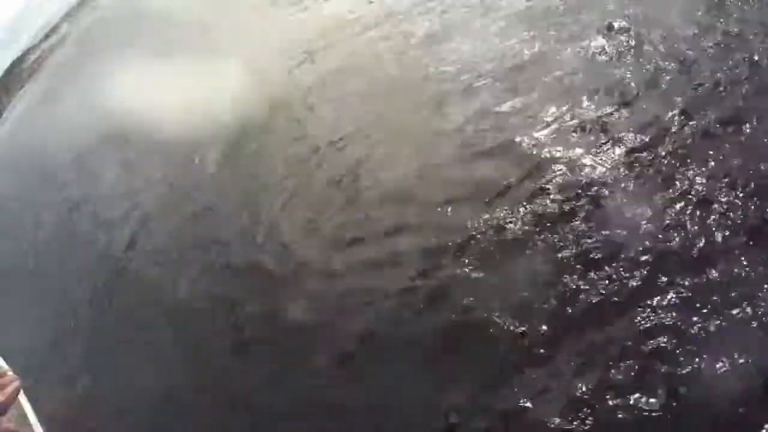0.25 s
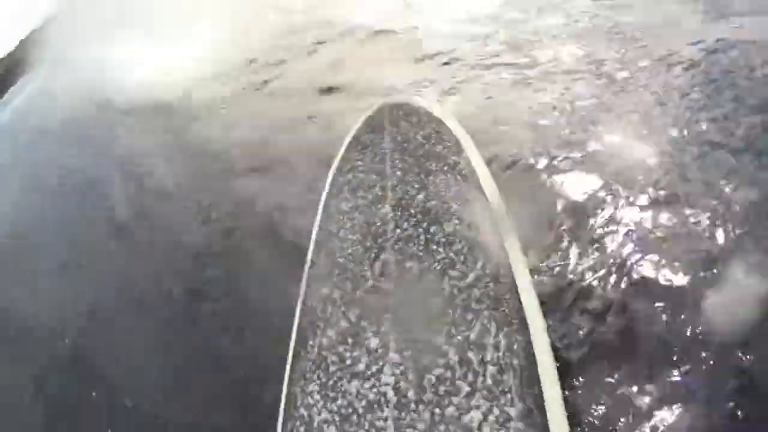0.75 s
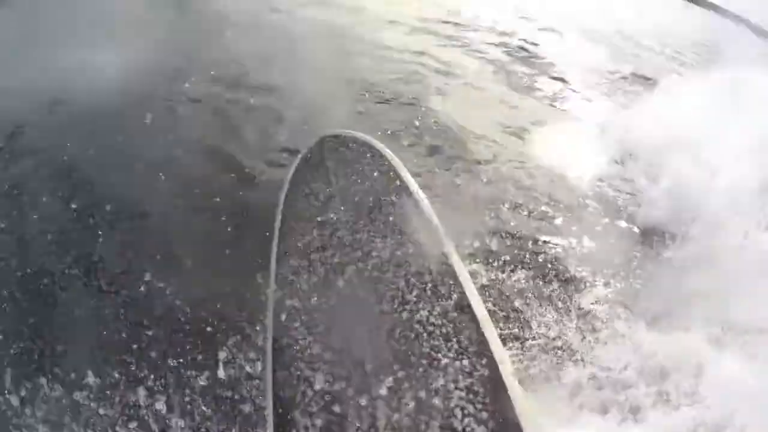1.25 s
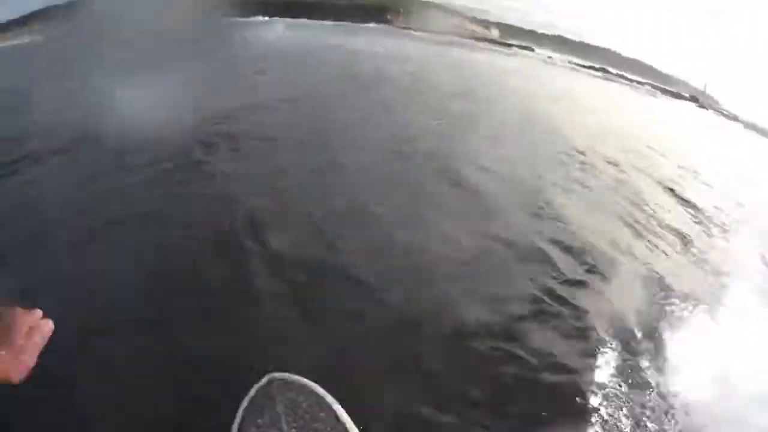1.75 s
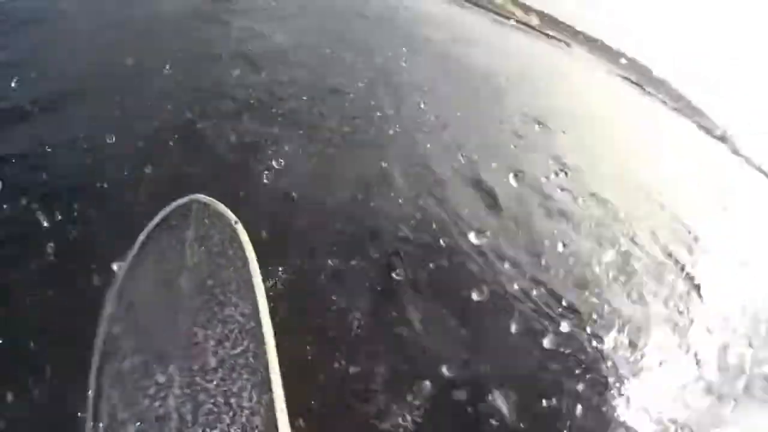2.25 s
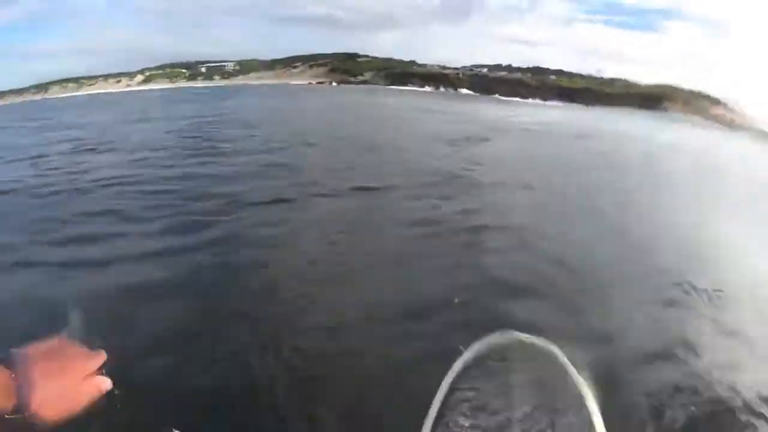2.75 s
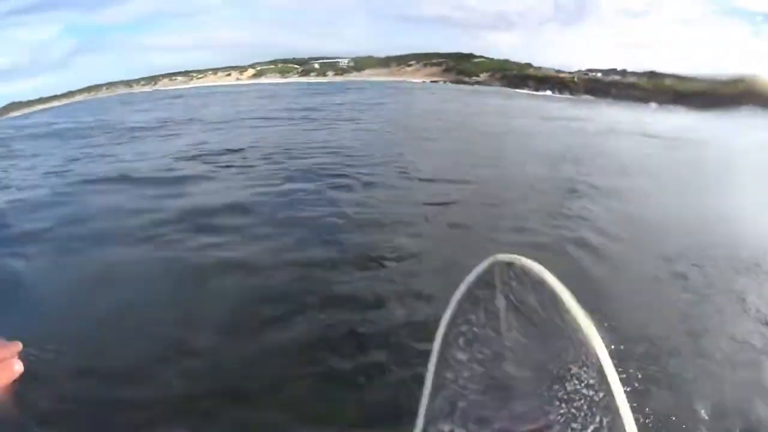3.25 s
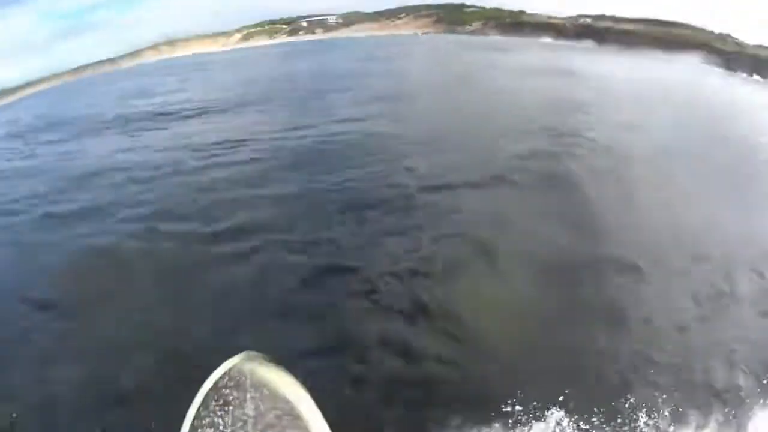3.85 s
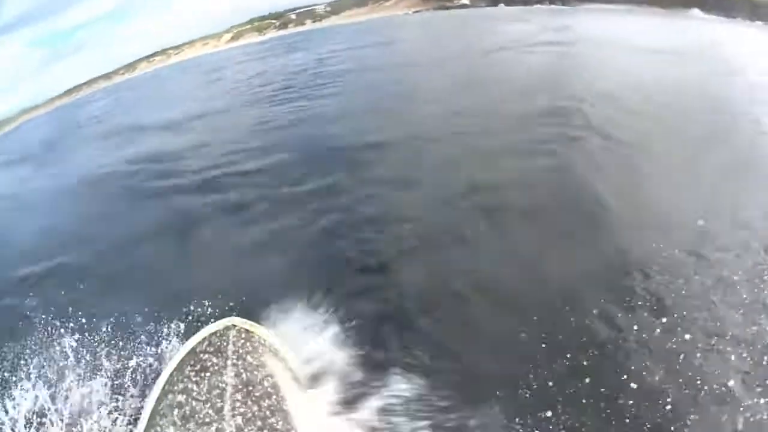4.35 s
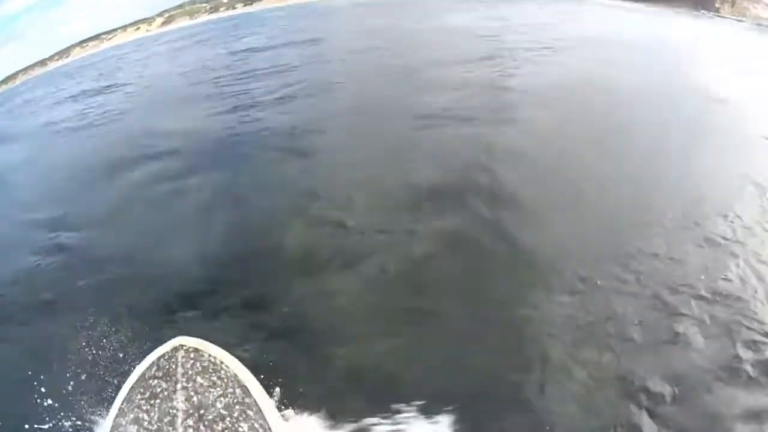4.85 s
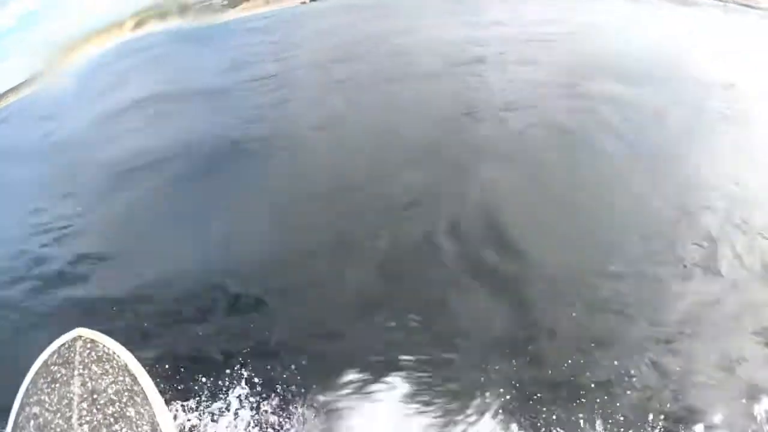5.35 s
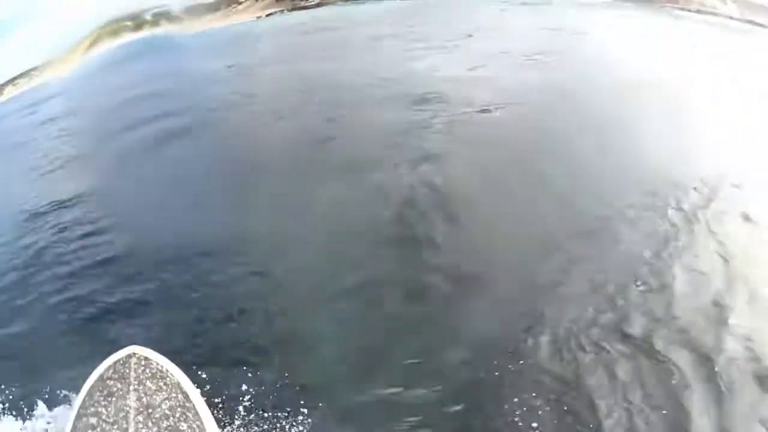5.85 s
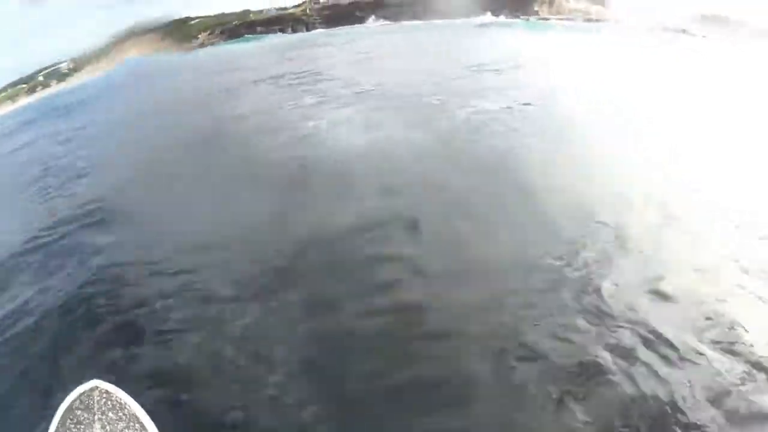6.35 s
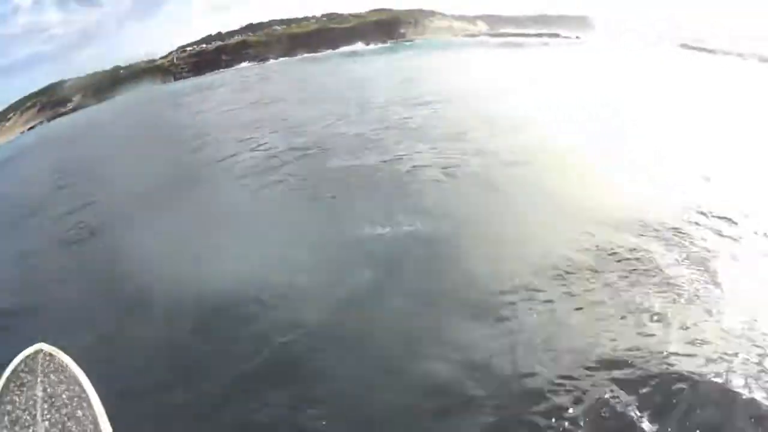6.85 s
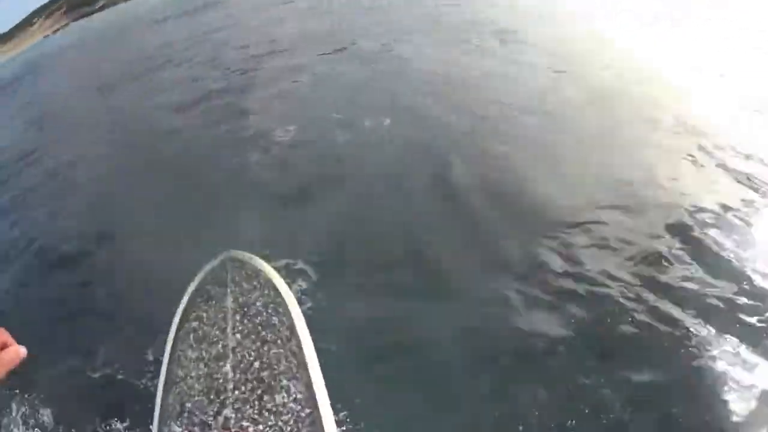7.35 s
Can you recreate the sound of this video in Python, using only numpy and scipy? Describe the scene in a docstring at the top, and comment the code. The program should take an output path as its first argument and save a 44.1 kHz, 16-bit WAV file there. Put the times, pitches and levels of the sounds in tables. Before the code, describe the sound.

Heard from inside a waterproof case on a surfer riding open sea: uneven rushing and washing water, fluttering low wind, dulled highs. One loud splash strikes the case around two seconds, crackling into hollow plops and a short watery warble toward the left. Afterwards the rush rises and falls with gusts, wind thumps cluster near three and a half to four seconds, and a few soft drops knock.

```python
"""Water on a sealed camera case above a surfboard

Wind buffets the two wet ports of the case, the sea rushes under the board and spray hisses: noise in half-octave
bands, coloured by the ports and raised and lowered by level curves. A sheet of water is thrown over the case:
a burst of drops excites falling thumps, case modes and ticks amid a spatter of small drops; a water film on
one port sings briefly as a wavering sine, and single drops fall before and after. The case muffles it all."""
import sys
import numpy as np
from scipy import signal
from scipy.fft import rfft, irfft, next_fast_len
from scipy.io import wavfile

SR = 44100
rng = np.random.default_rng(int(sys.argv[2]) if len(sys.argv) > 2 else 0)


def output_pcm(signal):
    """Save a mono or channel-first signal as 16-bit PCM at the path in sys.argv[1].

    Samples are clipped to [-1, 1] before scaling.
    """
    pcm = np.clip(np.atleast_2d(signal).T, -1, 1) * 32767
    wavfile.write(sys.argv[1], SR, np.round(pcm).astype(np.int16))


N = 335160


def amp(db):
    """Level law: dB to amplitude gain."""
    return 10 ** (np.asarray(db) / 20)


def rms_one(x):
    """Power normalisation: scaled to rms 1."""
    return x / np.sqrt(np.mean(x ** 2) + 1e-20)


def in_time(rows):
    """Linear interpolation: the columns of a table, sample by sample."""
    t, *columns = np.transpose(rows)
    return [np.interp(np.arange(N) / SR, t, column) for column in columns]


def in_pitch(rows, hz):
    """Interpolation on a logarithmic frequency axis: the columns of a table at the given frequencies."""
    at, *columns = np.transpose(rows)
    return [np.interp(np.log(np.maximum(hz, 1)), np.log(at), column) for column in columns]


def live(start, end):
    """Time gate: 1 between two times in s, else 0."""
    t = np.arange(N) / SR
    return (t > start) & (t < end)


def drift(rate):
    """Slow random modulation: noise through two equal poles at rate (Hz), spread 1."""
    step = 40   # samples between computed points
    pole = np.exp(-2 * np.pi * rate * step / SR)
    settle = 2000   # points dropped while the filter settles
    noise = rng.standard_normal(N // step + settle + 2)
    slow = signal.lfilter([1], [1, -2 * pole, pole * pole], noise)[settle:]
    return np.interp(np.arange(N) / step, np.arange(len(slow)), rms_one(slow))


def ring(clicks, hz, t60):
    """Damped resonator: a unit click sets a sine of height 1 ringing, 60 dB down after t60 (s)."""
    r, w = amp(-60 / (t60 * SR)), 2 * np.pi * hz / SR
    return signal.lfilter([0, np.sin(w)], [1, -2 * r * np.cos(w), r * r], clicks + 1e-18)


def low_pass(x, hz):
    """Second-order low-pass: 12 dB per octave above the corner."""
    return signal.lfilter(*signal.butter(2, hz, fs=SR), x + 1e-18)


HISS_GAIN_DB = -70.5   # gain applied to the sum of common and own noise


def hiss():
    """Partly correlated white noise: steady microphone noise, mostly common to both sides."""
    common, left, right = rng.standard_normal((3, N))
    return amp(HISS_GAIN_DB) * (0.53 * common + 0.44 * np.array([left, right]))


# short changes of wind on the ports, mostly buffets: t/s, peak change of wind level/dB, half-length/s
BUFFETS = [(0.0, 14, 0.028), (0.126, 8.5, .04), (0.302, 5, .05), (0.522, 5, 0.1), (1.27, 0, .04),
           (1.61, 7.5, 0.036), (1.985, 4, .05), (2.604, 6.5, .07), (3.384, 6, 0.024), (3.55, 11.5, 0.036),
           (3.808, 8, 0.034), (3.93, 9, 0.042), (4.107, 7, .04), (4.417, 4.5, 0.032), (4.912, 4, 0.036),
           (6.082, 1, 0.027), (6.82, -0.5, .04), (7.15, 2.5, .04), (7.49, 2.5, 0.049)]


def gusts_db():
    """Gaussian envelopes: each is a short bell-shaped change of the wind level."""
    t = np.arange(0, N, 40) / SR
    change = sum(db * np.exp(-((t - at) / half_s) ** 2) for at, db, half_s in BUFFETS)
    return np.interp(np.arange(N) / SR, t, change)


# colour of the sea through each port: f/Hz, left relative level/dB, right relative level/dB
PORT_COLOUR = [(20, -82, -73), (55, -70, -72), (183, -81, -79.5), (392, -80, -81), (645, -90.5, -85),
               (817, -76, -79), (1050, -81, -80), (1300, -83, -84), (1532, -78, -86), (2086, -95.5, -92),
               (2580, -96.5, -93.5), (3470, -99, -100), (5040, -106, -104), (6200, -103, -103),
               (7560, -110, -110), (9900, -114, -114)]
# how alike the ports hear it: f/Hz, likeness (0-1), phase of right relative to left/rad
PORT_LIKENESS = [(22, .99, 0), (60, .95, .1), (190, .63, 0), (400, .2, -1.8), (600, .4, -3.1),
                 (830, .6, -3.3), (1020, .6, -6.3), (1270, .75, -9.2), (1570, .8, -9.0), (2000, .3, -8.0),
                 (2550, .7, -7.9), (3500, .45, -7.8), (4100, .3, -5.1), (6050, .65, -5.3),
                 (11000, .62, -6.2)]


def through_ports(common, own):
    """Partial coherence: each port colours the sound; the right hears it phase-shifted, mixed with its own."""
    size = next_fast_len(N)
    hz = np.arange(size // 2 + 1) * SR / size
    left_db, right_db = in_pitch(PORT_COLOUR, hz)
    alike, phase = in_pitch(PORT_LIKENESS, hz)
    common, own = rfft(common, size), rfft(own, size)
    right = alike * np.exp(1j * phase) * common + np.sqrt(1 - alike ** 2) * own
    return irfft([amp(left_db) * common, amp(right_db) * right], size)[:, :N]


def foam(per_s, spread_db):
    """Random impulse train on noise: bursting bubbles of very uneven size."""
    sizes = amp(spread_db * np.minimum(rng.exponential(1, N), 4)) * rng.choice([-1, 1], N)
    bursts = rng.random(N) < per_s / SR
    return rng.standard_normal(N) + 0.22 * rms_one(sizes * bursts)


# the ride: t/s, rush level without gusts/dB, spray level/dB
RUSH_AND_SPRAY = [(0.0, -47, -58.5), (0.17, -51, -63.5), (0.34, -51, -62.5), (0.53, -50, -60.5),
                  (0.95, -43, -59.5), (1.25, -46, -55), (1.54, -48.5, -61.5), (2.09, -46.5, -61.5),
                  (2.22, -43, -57), (2.86, -50.5, -63.5), (3.2, -51.5, -64.5), (3.39, -49.5, -63),
                  (3.77, -49.5, -63), (4.02, -47, -58.5), (4.57, -47.5, -63), (4.8, -46.5, -58),
                  (5.16, -51.5, -62), (5.46, -49, -61), (5.76, -45.5, -64), (6.45, -49.5, -65.5),
                  (7.17, -49.5, -64), (7.6, -44, -63.5)]
# the wind on the ports: t/s, level without gusts/dB, deepest rumble relative to that level/dB
STEADY_WIND = [(0.0, -48, -4), (0.55, -50, 1.5), (0.75, -52.5, -2.5), (1.14, -47, -2.5), (1.6, -52, 0.5),
               (2.4, -50, 0), (2.9, -54, 0.5), (3.45, -52, -3.5), (4.0, -50, 0), (4.6, -53, -1),
               (5.4, -50, -3), (6.2, -49, -8), (6.9, -51.5, -5.5), (7.6, -50, -1)]
GUST_STIRS_RUMBLE, GUST_STIRS_RUSH = 1.27, 0.21   # share of a gust's dB that each follows
WASH_OFFSET_DB, WASH_FOLLOWS_SPRAY = 6, 0.56   # share of spray dB; the rest follows the rush


def sea_levels_db():
    """Level modulation: gusts stir wind, rumble and rush; wash follows both rush and spray."""
    rush_db, spray_db = in_time(RUSH_AND_SPRAY)
    wind_db, rumble_db = in_time(STEADY_WIND)
    gust_db = gusts_db()
    rumble_db = wind_db + rumble_db + GUST_STIRS_RUMBLE * gust_db
    wind_db = wind_db + gust_db
    rush_db = rush_db + GUST_STIRS_RUSH * gust_db
    wash_db = WASH_OFFSET_DB + WASH_FOLLOWS_SPRAY * spray_db + (1 - WASH_FOLLOWS_SPRAY) * rush_db
    return [rumble_db, wind_db, rush_db, wash_db, spray_db]


# a band joins the first layer whose top is not below its lower edge; spray takes the rest
RUMBLE_TOP_HZ, WIND_TOP_HZ, RUSH_TOP_HZ, WASH_TOP_HZ = 45, 100, 600, 1900
# spread of each layer's flicker, from rumble to spray: shared/dB, own to each band/dB
FLICKER = [(2.0, 1.5), (2.0, 1.5), (1.5, 1.5), (.8, .9), (.7, .4)]


def sea():
    """Band-filtered noise: half-octaves, flickering partly alone, form rumble, wind, rush, wash and spray."""
    draws = [through_ports(foam(400.0, spread_db=6.5), foam(400.0, spread_db=-3.5)) for _ in range(2)]
    layers = np.zeros((5, 2, N))
    lumps = [drift(4.0), drift(7.0), drift(28.0)]   # rumble and wind; rush and wash; spray
    edges = 16 * 2 ** np.arange(0, 10, .5)
    for k, (low, high) in enumerate(zip(edges, edges[1:])):
        band_filter = signal.butter(2, [low, high], "band", fs=SR, output="sos")
        band = signal.sosfilt(band_filter, draws[k % 2])   # neighbouring bands are independent
        kind = np.searchsorted([RUMBLE_TOP_HZ, WIND_TOP_HZ, RUSH_TOP_HZ, WASH_TOP_HZ], low)
        shared_db, own_db = FLICKER[kind]
        layers[kind] += band * amp(shared_db * lumps[kind // 2] + own_db * drift(17.0))
    return sum(amp(db) * rms_one(layer) for db, layer in zip(sea_levels_db(), layers))


# water film over the left port: t/s, centre f/Hz, peak level on the left/dB
FILM_TONE = [(2.225, 242, -62), (2.245, 270, -38), (2.29, 291, -42.5), (2.325, 277, -43), (2.351, 233, -36),
             (2.375, 169.4, -43), (2.395, 160, -63)]


def film():
    """Frequency-modulated oscillator: the film vibrates as a wavering near sine, mostly heard on the left."""
    hz, level_db = in_time(FILM_TONE)
    wavering_hz = hz * amp(0.19 * drift(31.0))
    tone = np.sin(2 * np.pi * np.cumsum(wavering_hz) / SR)
    left_right = amp([[0], [-9.0]])
    return amp(level_db) * tone * live(FILM_TONE[0][0], FILM_TONE[-1][0]) * left_right


# modes of the case: f/Hz, relative level/dB, 60 dB decay time/s
CASE_MODES = [(840, 6.5, 0.0068), (1086, 1, 0.013), (1590, 3, 0.013), (2470, 1.5, 0.009),
              (2910, 2.5, 0.005)]


def case(strikes):
    """Modal superposition: the case modes ring in alternating sign, dulled because water lands softly."""
    rings = sum(amp(db) * ring(hits, hz, t60) * (-1) ** k
                for k, (hits, (hz, db, t60)) in enumerate(zip(strikes, CASE_MODES)))
    return low_pass(rings, 3400)


# small drops of the thrown sheet: they swell to a peak, fall away fast, and a trickle dies slowly
SHEET_FROM_S, SHEET_PEAK_S, SHEET_END_S, SHEET_PEAK_DB = 2.06, 2.117, 2.4, -23.5
SWELL_DB_PER_S, FALL_DB_PER_S = 452, 448
TRICKLE_DB, TRICKLE_DB_PER_S = -43.5, 78   # trickle line: its level at the peak time, its fall


def sheet_db():
    """Piecewise exponential envelope: the level of the small drops."""
    late = np.arange(N) / SR - SHEET_PEAK_S
    fall = SHEET_PEAK_DB - FALL_DB_PER_S * late
    trickle = TRICKLE_DB - TRICKLE_DB_PER_S * late
    return np.where(late < 0, SHEET_PEAK_DB + SWELL_DB_PER_S * late, np.maximum(fall, trickle))


def sheet(per_s=800.0):
    """Random impact excitation: many small drops ring the case and the ports while the water runs over."""
    sizes = amp(3.5 * np.minimum(rng.exponential(1, N), 2.5)) * rng.choice([-1, 1], N)
    landings = rng.random(N) < per_s / SR
    hits = sizes * landings * amp(2 * rng.standard_normal((2, N)))   # uneven between the sides
    ports = low_pass(ring(hits, 540, 0.0023), 1300)
    spatter = low_pass(ring(hits, 6000, 0.001), 9300)
    body = low_pass(case([hits] * len(CASE_MODES)), 2600)
    sound = body + amp(9.5) * ports + amp(-0.5) * spatter
    return amp(sheet_db()) * rms_one(sound) * live(SHEET_FROM_S, SHEET_END_S)


# stragglers of the thrown sheet: a patter of drops, ever weaker and further apart
STRAGGLE_FROM_S, STRAGGLE_GAP_S, STRAGGLE_SLOWING = 2.1604, 0.0125, 0.025
STRAGGLE_DB, STRAGGLE_FADE_DB_PER_S = -17.5, 260.0   # relative thump level and its fade
STRAGGLE_HZ, STRAGGLE_CYCLES = 480, 0.44   # middle thump pitch, decay
STRAGGLE_RING_DB, STRAGGLE_TICK_DB = -26, -52.0   # middle relative levels


def stragglers(count):
    """Decaying random sequence: rows like those of the single drops, partly left to chance."""
    luck, k = rng.standard_normal((count, 6)), np.arange(count)
    late = STRAGGLE_GAP_S * k * (1 + STRAGGLE_SLOWING * k)
    rows = []
    for t, (thump_luck, pitch_luck, ring_luck, tick_luck, pan_luck, lag_luck) in zip(late, luck):
        thump_db = STRAGGLE_DB - STRAGGLE_FADE_DB_PER_S * t + 1.5 * thump_luck
        rows.append((STRAGGLE_FROM_S + t, thump_db, STRAGGLE_HZ * amp(2.5 * pitch_luck), STRAGGLE_CYCLES,
                     STRAGGLE_RING_DB + 3.0 * ring_luck, STRAGGLE_TICK_DB + 2.0 * tick_luck,
                     3.0 * pan_luck, 0.16 * lag_luck))
    return rows


def thump(hz, cycles):
    """Dispersion: a bending wave reaches the port, fast swings first and slow ones last."""
    turns = np.arange(round(4 * SR / hz)) * hz / SR
    swings = -np.sin(2 * np.pi * 1.75 * turns ** .46)
    onset = 1 - np.exp(-turns / .1)
    decay = np.exp(-(turns / cycles) ** 1.5)
    return swings * onset * decay


# single drops on the case, loud and faint: t/s, relative thump level/dB, nominal thump f/Hz,
# nominal thump decay/cycles, relative case ring level/dB, relative tick level/dB,
# left over right thump level/dB, lag of right behind left/ms
SINGLE_DROPS = [(0.29, -34.5, 140, 1, -54, -60, 6, -0.55), (1.1459, -18, 163, 0.5, -25.5, -51, -2, 0.81),
                (1.3294, -41, 440, 1, -29, -53, -22, 0.2), (1.7764, -32.5, 275, 2.1, -45, -52, 2, 0.82),
                (2.0652, -18, 270, 0.51, -16, -44, 8, -0.07), (2.069, -35, 270, 0.64, -16, -41, 0, 0.01),
                (2.0788, -23, 610, 0.49, -6, -32.5, -7, -0.01), (2.0803, -33, 600, 0.73, -14, -36, 3, 0.24),
                (2.087, -32, 340, 0.48, -12, -30, 3, 0.09), (2.0898, -8, 253, 0.34, -8, -34, 6, 0.33),
                (2.1046, -12, 410, 0.31, -10, -45, -11, 0.36),
                (2.1077, -16, 457, 0.35, -8.5, -33, -21, 0.56), (2.113, 0.5, 230, 0.39, -3, -32, 1.5, 0.15),
                (2.1196, -19, 174, 0.49, -15, -32, 13, -0.79), (2.1231, -16, 506, 0.3, -18, -43, -9, 0.29),
                (2.1295, -14, 447, 0.32, -24, -57, -6, 0.55), (2.1338, -35, 500, 0.64, -11, -61, 1, 0.44),
                (2.138, -20, 134, 0.84, -33, -59, -2, 0.48), (2.141, -16, 310, 0.8, -27, -57, -4, -0.97),
                (2.1504, -17.5, 513, 1.3, -21, -54, 13, -0.75),
                (2.1564, -10.5, 510, 0.4, -31, -43, -5, -0.36),
                (2.1751, -41, 500, 0.49, -17, -46, -7, -0.22), (2.306, -46, 280, 0.7, -30, -43.5, -6, -1.1),
                (2.309, -42, 270, 0.7, -36, -44, 2, -0.88), (2.3162, -48, 240, 0.6, -25.5, -53, 3, 0.09),
                (2.3391, -10.5, 270, 1.21, -19.5, -34.5, -1.5, 0.074),
                (2.5334, -14, 272, 0.24, -29, -48.5, -14.5, 0.65),
                (3.23, -42, 420, 0.7, -34, -59, 11, -0.43),
                (3.3665, -15.5, 204, 0.33, -41, -69, 0.5, -0.23),
                (3.811, -29.5, 130, 0.75, -57, -55, 1, -0.39),
                (5.0965, -36, 497, 0.88, -42, -60, -9, -0.41),
                (5.152, -23.5, 225, 0.26, -34, -66, -4.5, 0.55),
                (5.1993, -41, 140, 0.76, -41, -49.5, 2, -0.0078),
                (5.2881, -53, 500, 0.7, -32, -58, 0, 0.18), (5.7016, -31, 190, 0.24, -44, -62, 8, 0.68)]


def drops():
    """Impact excitation: each drop thumps both ports, rings the case unevenly and ticks; soft ones ring lower."""
    thumps, ticks = np.zeros((2, N + SR)), np.zeros((2, N))
    strikes = np.zeros((len(CASE_MODES), 2, N))
    rows = SINGLE_DROPS + stragglers(count=7)
    chance = rng.standard_normal((len(rows), 3, len(CASE_MODES)))   # left, right, common
    octaves = np.log2(np.array(CASE_MODES)[:, 0] / CASE_MODES[2][0])   # from the middle mode
    for (t, thump_db, hz, cycles, ring_db, tick_db, pan_db, lag_ms), luck in zip(rows, chance):
        tilt_db = .3 * (tick_db - ring_db + 18.0) * octaves   # a tick weak beside the ring: a soft drop
        for side, sign in enumerate((1, -1)):
            at = round((t - sign * lag_ms / 2000) * SR)   # half the lag on each side
            shape = thump(hz * amp(.5 * luck[side, 0]), max(cycles, .35))
            thumps[side, at:at + len(shape)] += amp(thump_db + 1.5 + sign * pan_db / 2) * shape
            strikes[:, side, at] += amp(ring_db - 12.0 + tilt_db + 2 * (luck[side] + luck[2]))
            ticks[side, at] += amp(tick_db + 23.0 + 2.3 * luck[side, 1])
    rebound = signal.butter(2, 50, "high", fs=SR)   # the ports leak, so a push swings back
    thumps = signal.lfilter(*rebound, low_pass(thumps[:, :N], 3700))
    tick_band = signal.butter(1, [4200, 7500], "band", fs=SR)
    ticks = low_pass(signal.lfilter(*tick_band, ticks + 1e-18), 8500)
    return thumps + case(strikes) + ticks


def scene():
    """Linear superposition: all that the two ports pick up."""
    return hiss() + sea() + film() + sheet() + drops()


CUTOFF_HZ = 11100


def record(dry):
    """Band limitation: a steep elliptic low-pass cuts the top."""
    top_cut = signal.ellip(12, .5, 45, CUTOFF_HZ, fs=SR, output="sos")   # ripple, stop depth in dB
    return signal.sosfilt(top_cut, dry)


dry = scene()
out = record(dry)
output_pcm(out)
```